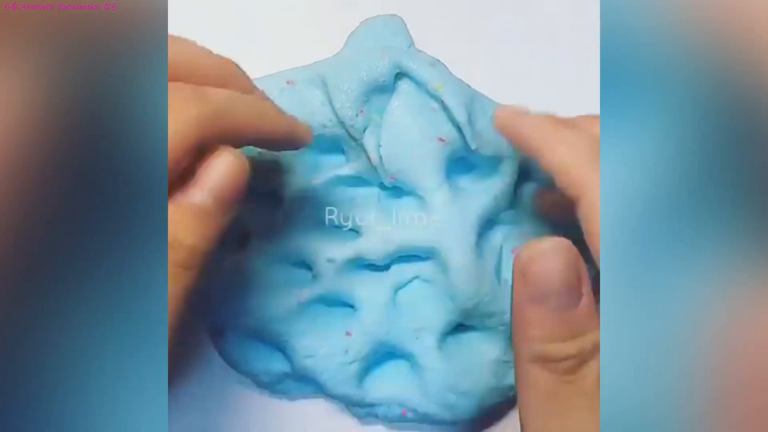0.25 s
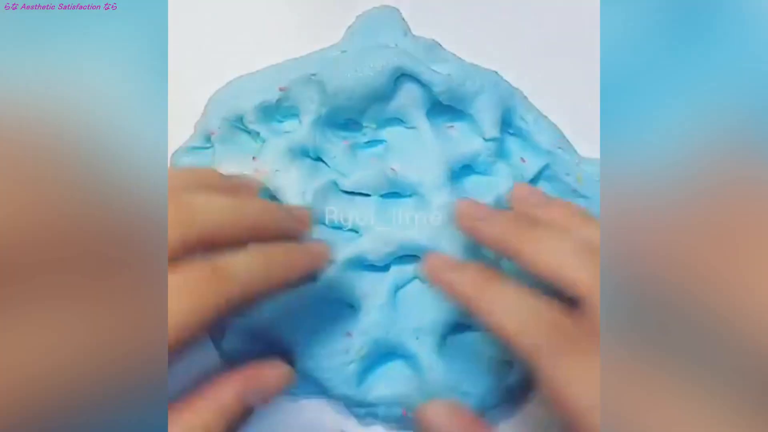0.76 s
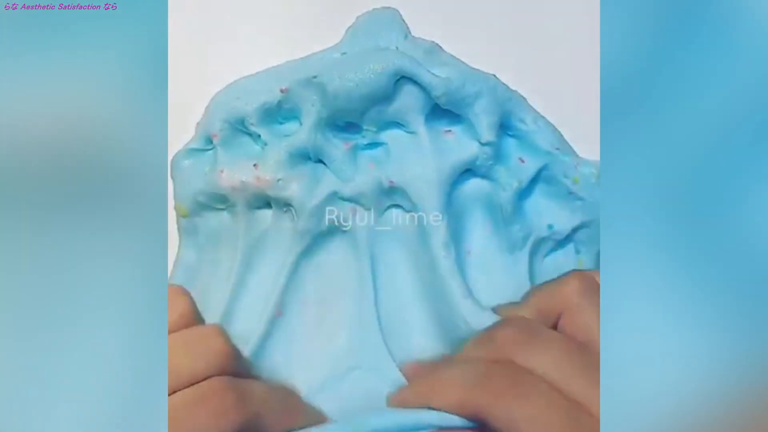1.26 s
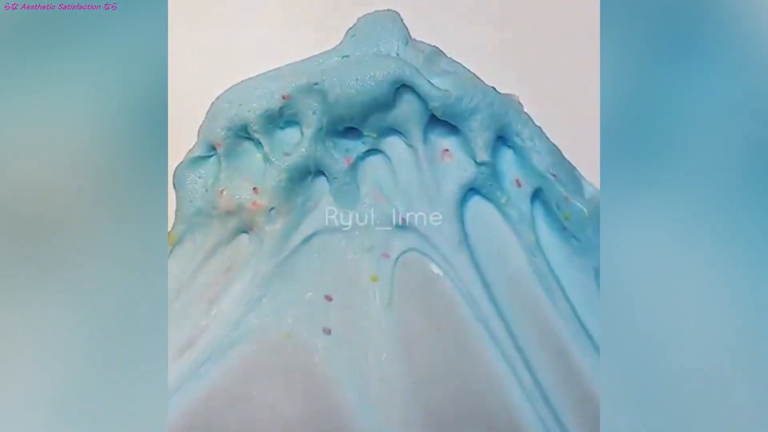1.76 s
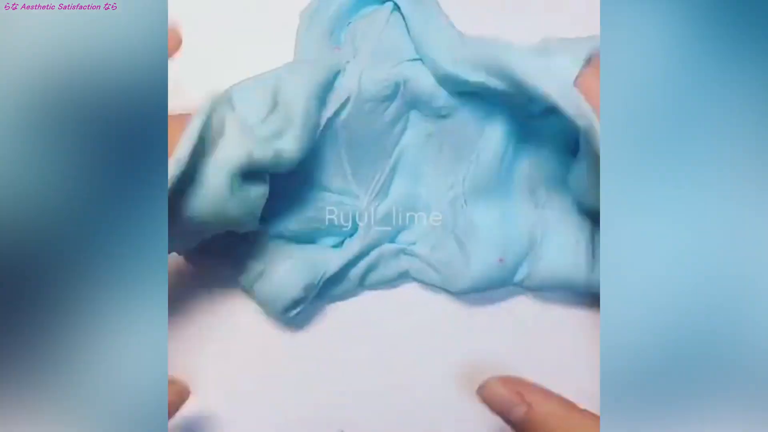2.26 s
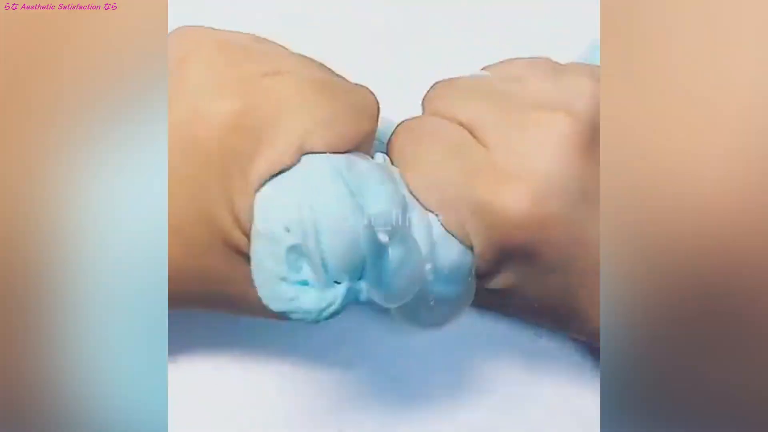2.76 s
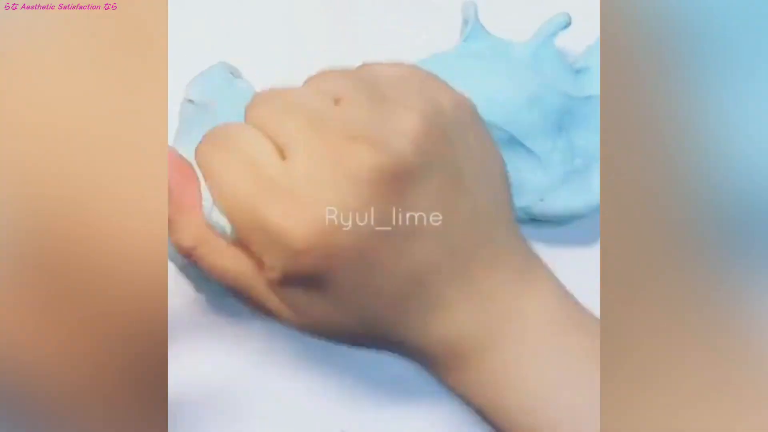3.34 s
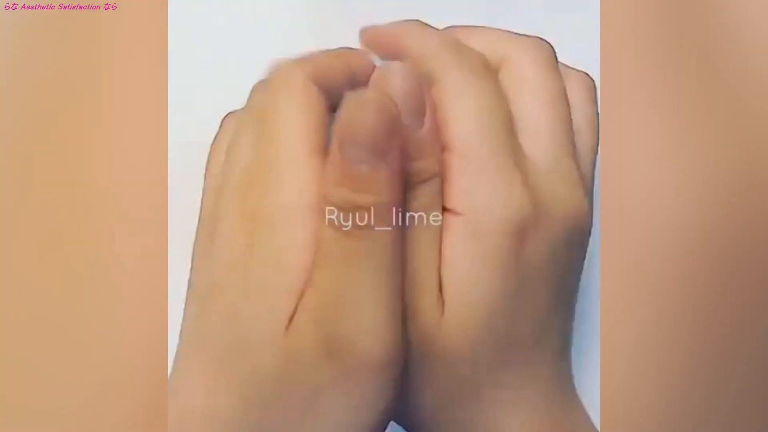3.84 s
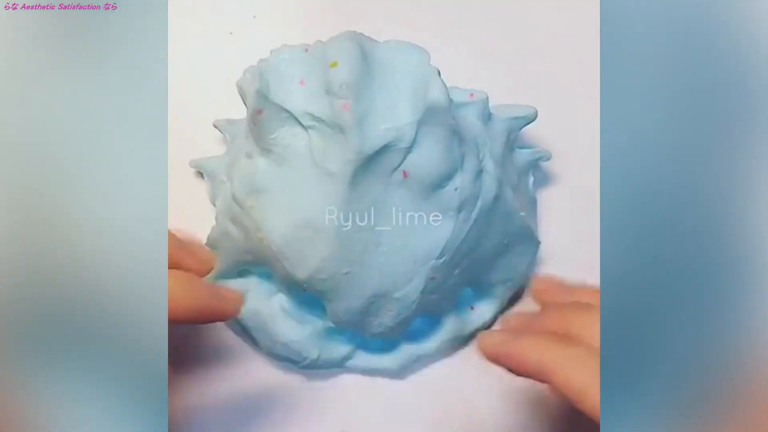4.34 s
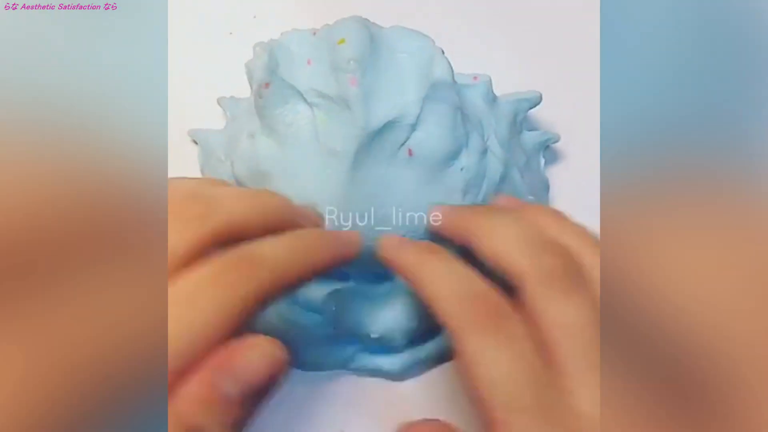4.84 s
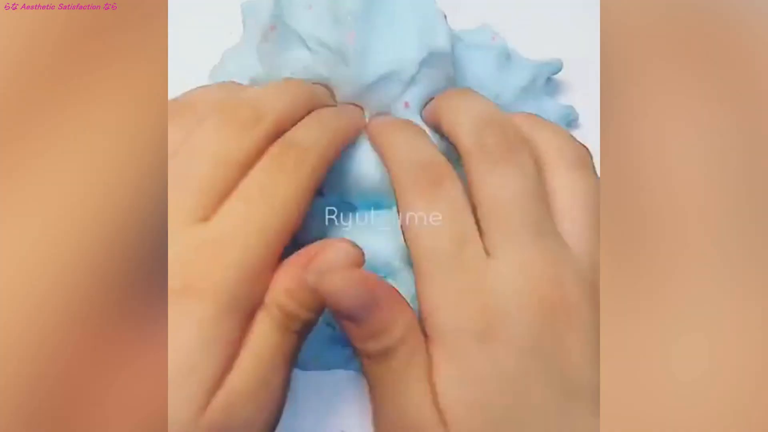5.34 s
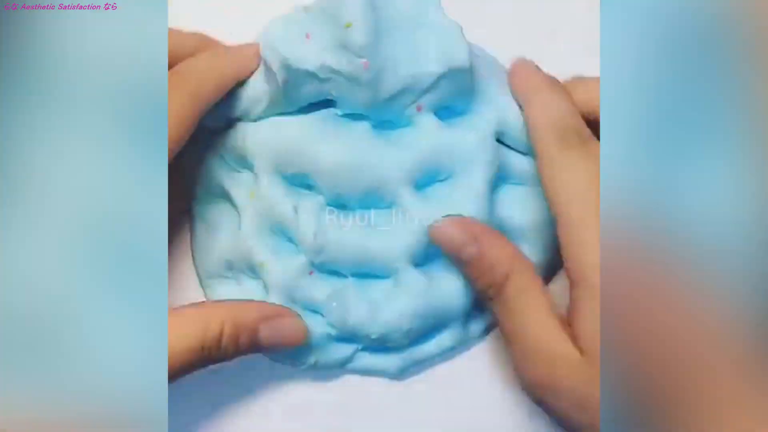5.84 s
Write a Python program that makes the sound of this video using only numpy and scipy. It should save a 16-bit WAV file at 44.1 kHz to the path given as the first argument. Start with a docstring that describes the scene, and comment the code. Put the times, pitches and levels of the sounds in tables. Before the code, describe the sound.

Close, dry phone pickup of foamy slime being handled in a small room. Short wet finger pushes with bubble pops come first, then quiet ticking crackle as it stretches. The middle is busiest: a soft heavy thump, clusters of sharp hollow pops, and gritty tearing while it is folded and squeezed. Later, single squelchy pokes alternate with near-quiet fizzing, ending in a crackly pull. Table hum and low hiss stay faint.

```python
"""Thick slime worked by two hands

Two hands poke, stretch, fold and squeeze thick slime on a table, close to a phone in a small quiet room.
Trapped air pockets burst as snapped films with ringing cavities; fingers squelch in, crushing dense bubbles.
The stretched foam tears in a fine crackle and fizz of random ruptures that follow the strokes of the hands.
Lump and hands thud as damped low tones, and the table hums in its modes over a faint rumble and hiss."""
import sys
import numpy as np
from scipy import signal
from scipy.fft import rfft, irfft, next_fast_len
from scipy.io import wavfile
from scipy.ndimage import uniform_filter1d

SR = 44100
rng = np.random.default_rng(int(sys.argv[2]) if len(sys.argv) > 2 else 0)


def generate_wav(signal):
    """Clip the signal to [-1, 1] and save it as 16-bit WAV at the path in sys.argv[1]."""
    frames = np.transpose(np.atleast_2d(signal))
    scaled = np.clip(frames, -1, 1) * 32767
    pcm = np.round(scaled).astype(np.int16)
    wavfile.write(sys.argv[1], SR, pcm)


N = 269451
TIME = np.arange(N) / SR

# air squeezed out along sinking fingers; levels hold before the sag during each push:
# start_s, length_s, level_db, wet_low_end_db (re level), spray_db (re level), finger_hole_hz
SQUELCHES = [(0.307, 0.028, -59.5, 0, 5.5, 1540), (0.329, 0.064, -51, -3, -14, 720),
             (0.701, 0.076, -55.5, -1, 2.5, 950), (1.51, 0.021, -76, -16, -7, 2100),
             (3.051, 0.087, -45.5, -18.5, -2, 1440), (3.635, 0.079, -50, -14, -1, 1500),
             (4.169, 0.0097, -64, 10, -10, 1360), (4.396, 0.041, -57, 1.5, 8, 1304),
             (4.423, 0.035, -49.5, -0.5, -10, 1200), (4.822, 0.061, -48.5, 0, -5.5, 860),
             (5.252, 0.034, -54.5, 0, -1, 904), (5.267, 0.048, -49, -7, -3, 984),
             (5.645, 0.016, -53.5, -7, 4.5, 1190), (5.665, 0.07, -48, -8.5, -5.5, 1150)]
# spectrum of the finest bubbles, in fizz and spray: frequency_hz, level_db (per Hz)
FIZZ_COLOUR = [(2500, -40), (4500, 0.5), (7500, 0), (10500, -3.5), (13500, -3.5), (16000, 1)]
POP_SIZE, POP_LEAD = 2048, 256  # samples in a pop, and those before its snap
RIP_S = .0012  # time constant of the film's rip before it snaps


def undb(db):
    """Decibels express an amplitude ratio: 20 dB per factor of ten."""
    return 10 ** (np.asarray(db) / 20)


def unit(x):
    """Equal mean power: scale a signal to rms 1."""
    return x / np.sqrt(np.mean(x ** 2) + 1e-24)


def add(out, start_s, x):
    """Superposition: pressures of separate sources sum from their start times."""
    i = max(int(start_s * SR), 0)
    out[i:i + len(x)] += x[:max(len(out) - i, 0)]


def band(x, lo_hz, hi_hz, order=2):
    """Causal band-pass filtering keeps the onset from smearing backwards."""
    coefficients = signal.butter(order, [lo_hz, min(hi_hz, .48 * SR)], "band", fs=SR)
    return signal.lfilter(*coefficients, x)


def colour(x, points):
    """Zero-phase spectral shaping by (Hz, dB) points joined on a log-frequency scale."""
    hz, db = np.transpose(points)
    size = next_fast_len(len(x) + POP_SIZE)
    f = np.maximum(np.fft.rfftfreq(size, 1 / SR), 1)
    gain = undb(np.interp(np.log(f), np.log(hz), db))
    return irfft(rfft(x, size) * gain, size)[:len(x)]


def walk(rate):
    """Slow random modulation: straight slopes between `rate` random levels a second, rms about 1.3."""
    k = int(SR / rate)
    held = np.repeat(rng.standard_normal(N // k + 1), k)
    return 1.6 * uniform_filter1d(held, k)[:N]


def ruptures(rate, spread_db):
    """Shot noise: tiny bubble walls snap at random, a few much harder than the rest; rms 1."""
    hardness = np.minimum(rng.exponential(size=N), 5)
    snapping = rng.random(N) < rate / SR
    sign = rng.choice([-1, 1], N)
    return unit(snapping * sign * undb(abs(spread_db) * hardness))


def ring(t, hz, cycles):
    """Damped resonance: a soft-walled cavity struck at t = 0 dies away within a few cycles."""
    return (t >= 0) * np.cos(2 * np.pi * hz * t) * np.exp(-np.abs(t) * hz / cycles)


def bubbles(count, lo_hz, hi_hz, cycles, spread_db):
    """Cavity resonance: small cavities open at random, each with its own short ring; rms 1."""
    out, t = np.zeros(N), np.arange(POP_SIZE // 2) / SR
    for when, pitch, size in rng.random((count, 3)):
        hz = lo_hz * (hi_hz / lo_hz) ** pitch
        add(out, when * N / SR, undb(spread_db * size ** 2) * unit(ring(t, hz, cycles)))
    return unit(out)


def hiss(level_db=-75.5):
    """Stationary coloured noise: the faint steady background."""
    # background spectrum: frequency_hz, level_db (per Hz, relative)
    quiet_colour = [(15, -59), (25, -7.5), (286, -3.5), (427, -7.5), (790, -12), (903, -12), (1630, -22.5),
                    (1760, -21), (2300, -25.5), (3540, -53.5), (10300, -42.5), (15000, -34.5)]
    return undb(level_db) * unit(colour(rng.standard_normal(N), quiet_colour))


def effort():
    """Strain drives rupture: dB levels of crackle and fizz swell with each stroke, then the foam settles."""
    # strokes that tear the foam: fingers lift from their holes, a long stretch, peeling and folding,
    # balling up, kneading, squeezing in both fists, fingers lifting again, a wide pull;
    # start_s, pull_s, ease_s, crackle_db (full pull, before tearing's trim), fizz_db (re crackle, before trim)
    strokes = [(0.09, 0.10, 0.06, -68.5, 7), (0.522, 0.045, 0.07, -65.5, 0), (0.98, 0.04, 0.25, -68, 2),
               (1.119, 0.05, 0.40, -69, 0.5), (1.30, 0.05, 0.10, -58.5, 0), (1.49, 0.045, 0.04, -58.5, -5),
               (1.57, 0.03, 0.13, -73.5, -12), (2.00, 0.23, 0.028, -57, -3), (2.25, 0.015, 0.018, -53, -4),
               (2.30, 0.02, 0.15, -70, 3.5), (2.432, 0.05, 0.05, -67, 3), (2.53, 0.07, 0.10, -57, 1),
               (2.66, 0.035, 0.20, -56.5, 1.5), (3.01, 0.075, 0.03, -51, -3.5), (3.30, 0.15, 0.10, -59, 1),
               (3.562, 0.06, 0.04, -55.5, -10), (3.74, 0.03, 0.30, -66.5, 0.5),
               (3.85, 0.11, 0.20, -61, 1.5), (4.06, 0.135, 0.01, -57, 6), (4.25, 0.05, 0.036, -76, 2.5),
               (4.619, 0.04, 0.12, -74, 2), (5.009, 0.02, 0.24, -77, 7), (5.489, 0.06, 0.20, -71.5, 2),
               (5.91, 0.14, 0.15, -56, -8.5)]
    rest_db, rest_fizz_db = -83, -81  # foam settling by itself, before tearing's trim
    # a stroke takes hold over grip_s, and grows at this rate as the slime thins
    grip_s, swell_db_per_s = 0.015, 86.5
    # foam disturbed by a finger fizzes on, this far below the push, with this decay time constant
    settle_db, settle_s = -27.5, 0.058
    crackle_power, fizz_power = undb(rest_db) ** 2, undb(rest_fizz_db) ** 2
    for start_s, pull_s, ease_s, db, fizz_db in strokes:
        past_top = TIME - start_s - pull_s
        swell = undb(swell_db_per_s * np.minimum(past_top, 0))
        ease = np.exp(-(np.maximum(past_top, 0) / ease_s) ** 1.3)
        pull = np.clip((TIME - start_s) / grip_s, 0, 1) * swell * ease
        crackle_power = crackle_power + (pull * undb(db)) ** 2
        fizz_power = fizz_power + (pull * undb(db + fizz_db)) ** 2
    for start_s, length_s, db, *_ in SQUELCHES:
        age = TIME - start_s - length_s
        settling = (age > 0) * np.exp(-np.abs(age) / settle_s)
        fizz_power = fizz_power + (settling * undb(db + settle_db)) ** 2
    return 10 * np.log10(crackle_power), 10 * np.log10(fizz_power)


def rumble(effort_db, rumble_db=-73, follow=0.56):
    """Forced vibration: the working hands shake the table a little, more so when they pull harder."""
    shake_colour = [(30, -19.5), (48, -10.5), (62, 1.0), (85, -10.0), (150, -7), (300, -14.5), (600, -27.5)]
    shake = unit(colour(rng.standard_normal(N), shake_colour))
    level_db = rumble_db + follow * (effort_db - effort_db.mean())
    return shake * undb(level_db + 2.3 * walk(rate=19))


def tearing(coarse_db, fine_db, crackle_db=-1.5, fizz_db=-1, patch_db=-5, drift_db=4, tick_db=-6):
    """Size sets pitch as foam cells give way: little pockets tick, smaller cells crackle, the finest fizz."""
    # spectrum of the smaller cells: frequency_hz, level_db (per Hz)
    crackle_colour = [(100, -18.5), (300, 0), (650, -3.5), (1100, 0), (1600, -2.5), (2300, -3), (3200, -6),
                      (4500, -10.5), (7000, -29.5)]
    flurry = undb(1.9 * walk(rate=110))
    cells = ruptures(rate=1900, spread_db=2.0)
    crackle = unit(colour(cells + 1.3 * rng.standard_normal(N), crackle_colour))
    fizz = unit(colour(cells + .9 * rng.standard_normal(N), FIZZ_COLOUR))
    # patches of like-sized cells tear together, so the colour of the crackle keeps shifting
    patches = np.zeros(N)
    for hz in (1150, 1720, 2370, 3100):
        patches += undb(drift_db * walk(rate=25)) * band(cells, hz, 1.35 * hz)
    ticks = bubbles(count=190, lo_hz=1400, hi_hz=8000, cycles=.9, spread_db=18)
    coarse = unit(crackle + undb(patch_db) * unit(patches) + undb(tick_db) * ticks)
    return flurry * (undb(coarse_db + crackle_db) * coarse + undb(fine_db + fizz_db) * fizz)


def pop(mouth_hz, pocket_hz, plop_db, snap_db, splutter_db, splutter_s=0.0027, lead_db=-7, ring_db=3,
        mouth_cycles=1.3, pocket_cycles=1.4, recoil_db=-16):
    """Impulse excites cavities: a film rips and snaps, its rim splutters, mouth rings high and pocket low."""
    level_size = 220  # samples (5 ms) over which the crack's level is reckoned
    t = (np.arange(POP_SIZE) - POP_LEAD) / SR
    before = undb(lead_db) * np.exp(-np.abs(t) / RIP_S)
    after = np.exp(-np.abs(t) / splutter_s)
    splutter = unit(rng.standard_normal(POP_SIZE) ** 3 * np.where(t < 0, before, after))
    # the film lets go in two steps, a fraction of a millisecond apart
    second_step = np.arange(POP_SIZE) == POP_LEAD + rng.integers(8, 30)
    film = unit(1. * (t == 0) - .7 * second_step)
    burst = unit(film + undb(splutter_db) * splutter)
    mouth = unit(ring(t, mouth_hz, mouth_cycles))
    pocket = unit(ring(t - .0005, pocket_hz, pocket_cycles))
    air = burst + undb(ring_db) * mouth
    crack = unit(band(air, 820, 3500))
    snap = unit(band(air, 4200, 15000, order=3))
    plop = unit(band(pocket + 2.3 * burst, pocket_hz / 2, pocket_hz * 2))
    recoil = unit(band(film, 220, 700))  # the soft wall around the pocket springs back
    sound = crack + undb(plop_db) * plop - undb(snap_db) * snap + undb(recoil_db) * recoil
    return sound * np.sqrt(level_size / POP_SIZE)


def small_pops(effort_db, count=60, over_db=3, spread_db=6, plop_db=-7, snap_db=-3, splutter_db=5):
    """Rate follows strain: lesser pockets burst at random, more often and louder the harder the pull."""
    chance = np.cumsum(np.sqrt(undb(effort_db)))
    out = np.zeros(N)
    for when, size, mouth, pocket in rng.random((count, 4)):
        i = np.searchsorted(chance, when * chance[-1])
        sound = pop(1900 * 4.2 ** mouth, 800 * 2 ** pocket, plop_db, snap_db, splutter_db)
        level_db = effort_db[i] + over_db + spread_db * (size - .5)
        add(out, (i - POP_LEAD) / SR, undb(level_db) * sound)
    return out


def squelches(rise_s=0.0071, fall_s=0.0079, sag_db=4, gurgle_db=0, hole_db=-3, hole_cycles=0.89):
    """Noise-driven resonance: a sinking finger crushes dense small bubbles, which ring in its hole."""
    # spectrum of the squish: frequency_hz, level_db (per Hz)
    squish_colour = [(400, -24.5), (750, -4), (1100, 4), (1600, -5.5), (2200, -1.5), (2900, -0.5),
                     (4500, -5.5), (7000, -57)]
    # spectrum of the wet low end: frequency_hz, level_db (per Hz)
    wet_colour = [(100, -2.5), (200, 5.5), (400, 3), (700, -8.5), (1200, -26.5)]
    crush = ruptures(rate=5000, spread_db=3.5) * undb(2.8 * walk(rate=260))
    squish = unit(colour(crush, squish_colour))
    wet = unit(colour(crush, wet_colour))
    spray = unit(colour(crush, FIZZ_COLOUR))
    gurgle = bubbles(count=800, lo_hz=600, hi_hz=4000, cycles=3.2, spread_db=14)
    squish = unit(squish + undb(gurgle_db) * gurgle)
    out = np.zeros(N)
    for start_s, length_s, db, wet_db, spray_db, hole_hz in SQUELCHES:
        t = np.arange(int((length_s + 5 * fall_s) * SR)) / SR
        i = int(start_s * SR) + np.arange(len(t))
        rise = np.minimum(t / rise_s, 1)
        fall = np.exp(-np.maximum(t - length_s, 0) / fall_s)
        push = rise * fall * undb(db - sag_db * t / length_s)
        hole = unit(signal.fftconvolve(squish[i], ring(t, hole_hz, hole_cycles))[:len(t)])
        body = unit(unit(squish[i]) + undb(hole_db) * hole)
        add(out, start_s, push * (body + undb(wet_db) * unit(wet[i]) + undb(spray_db) * unit(spray[i])))
    return out


def pops(dry_splutter_db=6, wet_splutter_db=7.5):
    """Sudden pressure release: large pockets burst, spluttering more under a sinking finger."""
    # large air pockets bursting, level_db being that of the crack over 5 ms:
    # snap_s, level_db, mouth_hz, pocket_hz, plop_db (re level), snap_db (re level)
    large_pockets = [(0.3124, -61.5, 8950, 1750, 5, 16), (0.3362, -41, 2630, 780, 6, -1.5),
                     (0.3568, -33.5, 7940, 595, -0.5, -3), (0.7095, -50, 9300, 1030, -13, -3.5),
                     (0.7242, -40, 5300, 850, -0.5, -3), (0.732, -48, 1410, 780, 1, -21),
                     (0.7622, -54, 6560, 1020, 13, -1), (1.1209, -50, 5800, 1430, -32, 1.5),
                     (1.167, -57.5, 1850, 1030, -12, -14), (1.3546, -52, 1720, 850, -27, -24),
                     (2.2249, -45.5, 1530, 820, -14.5, -11), (2.2622, -43.5, 4500, 300, -11, -2),
                     (2.4096, -58, 1270, 300, -17, -6), (2.5168, -48, 1220, 325, 2, -18),
                     (2.576, -32.5, 1780, 980, -9.5, -28), (2.7539, -36.5, 3020, 1100, -11.5, -32),
                     (2.7725, -52.5, 1510, 386, 8.5, 4), (2.7902, -50, 7000, 1260, 1.5, -1.5),
                     (2.823, -44, 1500, 674, -18.5, -24), (2.8429, -42, 1380, 740, -17, -7.5),
                     (2.866, -24, 2580, 944, 0.5, -12.5), (2.9241, -49, 7600, 870, 1, -4.5),
                     (2.9735, -39, 7070, 1510, -24, 7), (3.3875, -57.5, 6130, 1266, 2, 2.5),
                     (3.4185, -42, 2920, 1140, 0, -23.5), (3.4245, -43, 2760, 1000, 5, 8.5),
                     (3.4444, -39.5, 5270, 1830, 3, 0.5), (3.451, -31, 3130, 417, -8, -5.5),
                     (3.502, -38, 2100, 940, -4.5, -1), (3.5071, -38, 9000, 940, -2, 0),
                     (3.5563, -37, 8450, 1620, -22, 0), (3.5709, -45.5, 4900, 2080, -3, 1),
                     (3.9363, -47, 7400, 1580, -19, 1.5), (3.9908, -52.5, 2070, 1090, -8, 3),
                     (4.0152, -50, 1860, 990, -7, -2.5), (4.0466, -46.5, 2200, 420, -21, -6),
                     (4.0507, -39, 2160, 360, -18, -16), (4.084, -53.5, 8700, 1670, -20, 8),
                     (4.1256, -52.5, 2060, 530, -8, 3), (4.1348, -47, 9900, 1640, -18, 4),
                     (4.1555, -50.5, 9900, 1620, -19, 9), (4.1696, -29.5, 2820, 1040, -4.5, 1),
                     (4.1966, -60.5, 7100, 1220, -26, 11), (4.425, -35, 1470, 475, -8.5, -3),
                     (4.6606, -61.5, 2060, 1085, -18, -4), (4.7064, -56.5, 2800, 1410, -11, -6),
                     (4.8204, -53, 7100, 482, 3.5, 9), (4.8453, -52, 2700, 1233, 7, -10),
                     (4.8516, -46.5, 7350, 760, -1, -7), (5.0446, -65.5, 2840, 1020, 3.5, -16),
                     (5.2523, -49, 7900, 540, -3.5, 10.5), (5.2722, -34, 2970, 1057, -2, -14),
                     (5.574, -72.5, 8900, 1040, -4, 21.5), (5.6726, -42, 4300, 950, 5.5, -4),
                     (5.7233, -43.5, 2060, 1005, 8.5, -7), (5.7894, -53.5, 3690, 1520, -11, -0.5),
                     (5.865, -58.5, 2130, 399, 2, -12)]
    out = np.zeros(N)
    for snap_s, db, *pocket in large_pockets:
        wet = any(start_s - RIP_S <= snap_s <= start_s + length_s for start_s, length_s, *_ in SQUELCHES)
        sound = pop(*pocket, wet_splutter_db if wet else dry_splutter_db)
        add(out, snap_s - POP_LEAD / SR, undb(db) * sound)
    return out


def thuds(cycles=0.73, swell_s=0.054):
    """Modal excitation: the soft lump's blow is dead and low; its slow push sets the table top humming."""
    # soft blows on the table, each with its own strength and pitch: start_s, peak_db, pitch_hz, hum_peak_db
    blows = [(0.327, -55, 169, -50.5), (0.746, -48, 152, -56), (1.01, -46, 242, -60.5),
             (1.429, -50, 264, -86), (2.266, -46, 222, -45.5), (2.297, -41, 127, -60.5),
             (2.324, -36, 176, -39.5), (2.344, -31, 208, -55.5), (2.432, -45, 146, -54),
             (2.517, -37.5, 320, -67.5), (2.602, -45, 333, -65), (3.104, -53, 199, -55),
             (3.17, -51.5, 312, -65.5), (3.447, -41, 304, -75), (3.639, -42, 275, -67),
             (3.735, -42.5, 454, -51), (3.857, -41.5, 217, -48), (4.424, -51, 300, -50),
             (4.851, -40, 340, -54.5), (5.117, -49.5, 461, -76), (5.287, -63, 110, -49),
             (5.690, -44, 182, -49), (5.863, -47, 254, -59)]
    # modes of the table top: frequency_hz, t60_s, level_db (relative)
    table_modes = [(62.3, 0.2, 6.5), (78.7, 0.32, -6), (107, 0.23, -10), (150, 0.12, -1.5)]
    t = np.arange(SR // 2) / SR
    hum = np.zeros(len(t))
    for hz, t60_s, db in table_modes:
        hum += undb(db) * np.sin(2 * np.pi * hz * t) * np.exp(-np.log(1000) * t / t60_s)
    hum = hum * (1 - np.exp(-t / swell_s))
    out = np.zeros(N)
    for start_s, db, hz, hum_db in blows:
        age = t * hz / cycles
        blow = np.sin(2 * np.pi * hz * t) * np.exp(-age) * (1 - np.exp(-4 * age))
        add(out, start_s, undb(db) * blow / np.abs(blow).max() + undb(hum_db) * hum / np.abs(hum).max())
    return out


def room(x, wet_db=-19, t60_s=0.18, treble_t60_s=0.13, first_s=0.011):
    """Diffuse reverberation: nearby walls add a short, dull noise tail whose treble dies sooner."""
    # spectrum of the tail: frequency_hz, level_db (relative)
    tail_colour = [(60, -9.5), (250, -3), (600, -6), (1100, -8), (1700, -5.5), (2800, -11), (6000, -9.5),
                   (14000, -13.5)]
    t = np.arange(SR // 2) / SR
    noise = colour(rng.standard_normal(len(t)), tail_colour)
    low = colour(noise, [(1300, 0), (2600, -30)])
    low_tail = low * np.exp(-np.log(1000) * t / t60_s)
    treble_tail = (noise - low) * np.exp(-np.log(1000) * t / treble_t60_s)
    onset = np.minimum(t / first_s, 1) ** 2
    tail = unit((low_tail + treble_tail) * onset) / np.sqrt(len(t))  # unit energy
    return x + undb(wet_db) * signal.fftconvolve(x, tail)[:N]


def scene():
    """Superposition: slime and thuds sound in the room; table rumble and hiss join without reverberation."""
    coarse_db, fine_db = effort()
    slime = tearing(coarse_db, fine_db) + small_pops(coarse_db) + squelches() + pops()
    return (room(slime + thuds()) + rumble(coarse_db) + hiss())[None]


def record(dry, lag_cycles=0.94, knee_hz=45, top_hz=16500):
    """Dispersion: the phone delays lows by about a cycle, so blows chirp downwards; it dulls and cuts the top."""
    # the phone's response: frequency_hz, gain_db
    phone_response = [(20, -16), (58, 0), (13800, 0), (14200, -16), (16000, -18), (22000, -40)]
    size = next_fast_len(N + SR // 4)
    f = np.fft.rfftfreq(size, 1 / SR)
    lag = np.exp(-2j * np.pi * lag_cycles * np.log(1 + f / knee_hz))
    lagged = irfft(rfft(dry[0], size) * lag, size)[:N]
    top_cut = signal.ellip(8, .2, 70, top_hz, fs=SR, output="sos")
    return signal.sosfilt(top_cut, colour(lagged, phone_response))[None]


dry = scene()
out = record(dry)
generate_wav(out)
```